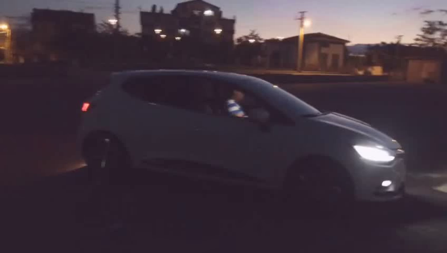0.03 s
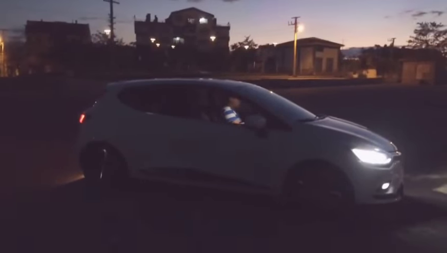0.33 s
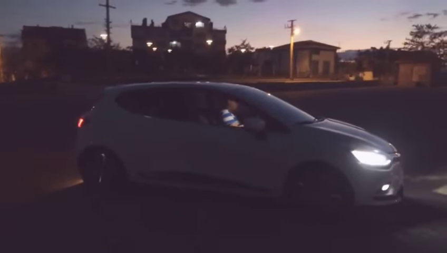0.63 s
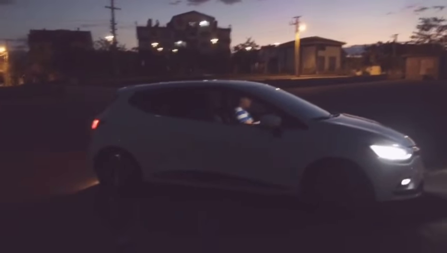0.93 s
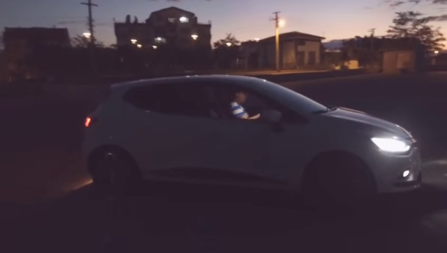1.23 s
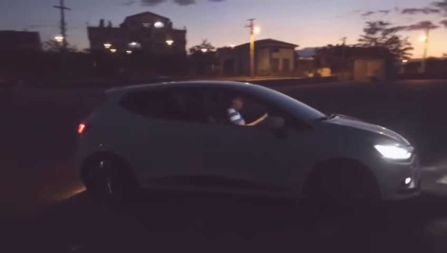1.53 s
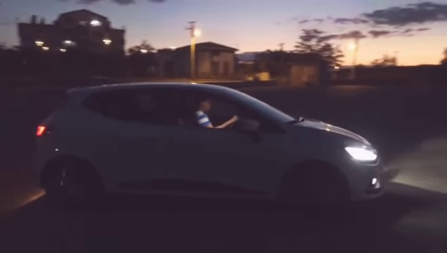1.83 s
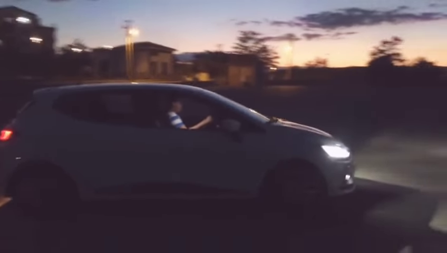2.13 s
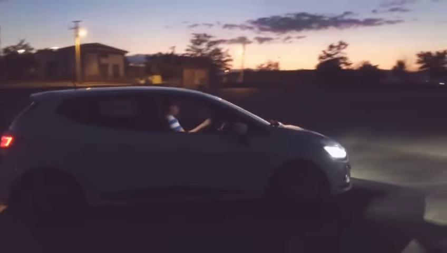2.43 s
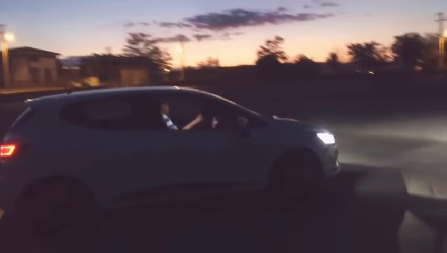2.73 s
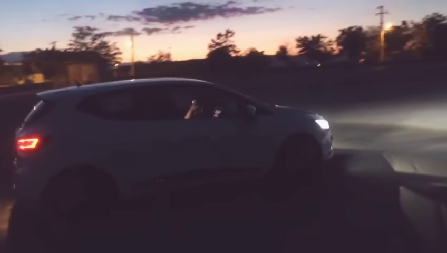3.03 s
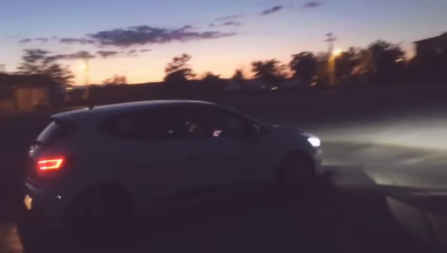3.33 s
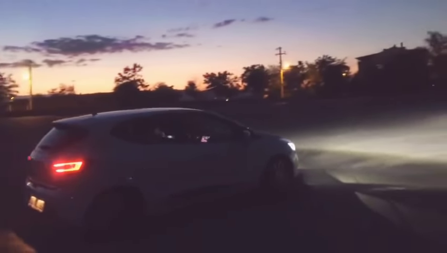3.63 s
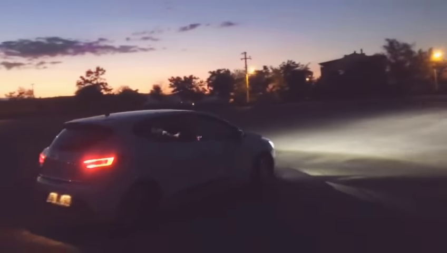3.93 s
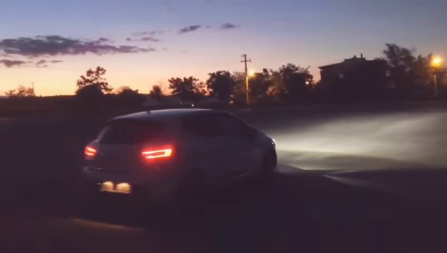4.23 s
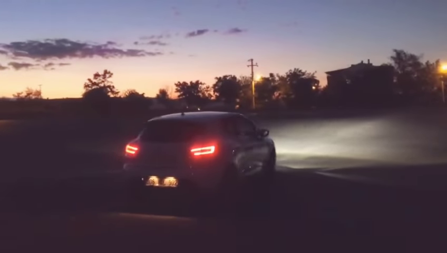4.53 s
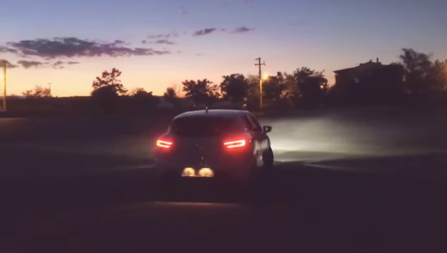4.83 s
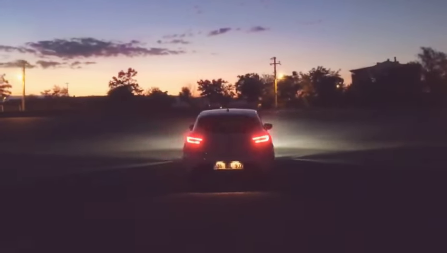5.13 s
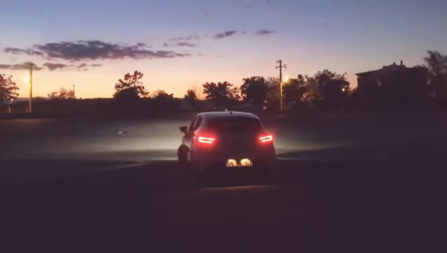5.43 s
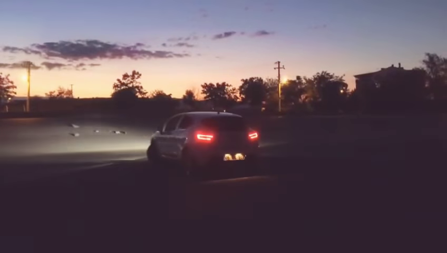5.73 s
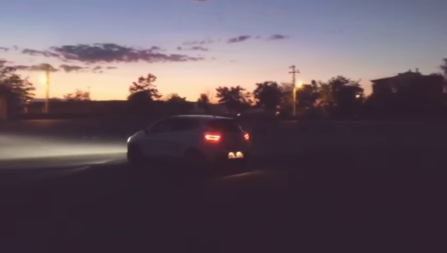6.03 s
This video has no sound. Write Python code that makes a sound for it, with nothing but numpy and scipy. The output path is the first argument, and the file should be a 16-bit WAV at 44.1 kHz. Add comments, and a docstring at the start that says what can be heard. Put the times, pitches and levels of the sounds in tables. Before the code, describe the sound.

A small diesel hatchback circles slowly on an open gravel lot, its engine knocking and humming under light wind rumble on the microphone. The tyres crunch louder as it passes close by, with ringing stone pops, hollow thuds and very short squeals. The engine sags in the turn, then picks up as the car heads away, still grinding over grit.

```python
"""An open gravel lot: a small diesel hatchback circles slowly, passes the microphone and drives off.
The engine knocks and hums underneath, sagging in the turn, with a thin belt whine on top. The tyres bite
into grit, drum, throw sand and slip in short squeals. Pinched stones pop and ring briefly in the tread,
lower from the front, higher from behind; flung grit clicks on the ground and stone chips squeak.
Light gusts buffet the microphone."""
import sys
import numpy as np
from scipy import signal
from scipy.fft import rfft, irfft
from scipy.io import wavfile
from scipy.ndimage import uniform_filter1d, map_coordinates

SR = 44100
rng = np.random.default_rng(int(sys.argv[2]) if len(sys.argv) > 2 else 0)


def to_wav(sig):
    """Store sig (one row per channel, or 1-D mono) as 16-bit WAV at the path in sys.argv[1].

    Samples outside -1..1 are clipped; the rate is SR.
    """
    pcm = np.clip(np.atleast_2d(sig), -1, 1) * 32767
    pcm = np.round(pcm).astype(np.int16)
    wavfile.write(sys.argv[1], SR, pcm.T)  # frames by channels


N = 276507

# Table levels are set ahead of each layer's trims; a spectrum gives only the tone colour.
# the car turning away: time_s, tread_ring_hz, behind_share (0 from the front, 1 from behind)
HEADING = [(0, 916.1, 0.09), (1.3, 938, 0), (1.8, 1020, 0.1), (2.2, 972.6, 0.06), (2.4, 890.8, 0.03),
           (2.62, 888, 0.13), (3.1, 1073, 0.47), (3.8, 1073, 0.5), (4.3, 1098, 0.78), (4.8, 1109, 1),
           (5.6, 1109, 0.93), (6.27, 1106, 0.78)]

# the engine idles, sags under load in the turn, then picks up: time_s, firing_hz
FIRING_RATE = [(0,46.7),(1.35,46.8),(1.6,44),(2.35,43.9),(2.85,41.3),(3.2,40.3),(3.6,42),(3.85,41.5),(4.1,43),(4.7,46.6),(5.15,51),(5.5,54),(6.27,61)]
# engine faders: time_s, exhaust_db, clatter_db
ENGINE_LEVELS = [(0,-46,-48.5),(.6,-42.5,-45.5),(1.2,-34.5,-45.5),(1.7,-41.5,-44.5),(2.4,-42.5,-50),(3.2,-42.5,-50.5),(4.2,-42,-45),(5.2,-45.5,-43.5),(6.27,-47,-43.5)]
# partials of the exhaust hum: firing_multiple, level_db
EXHAUST_PARTIALS = [(1,-4),(1.5,-11),(2,5),(3,2.5),(4,-0.5),(5,-21.5),(6,-14)]
# diesel clatter: freq_hz, level_db
CLATTER_SPECTRUM = [(100, -5.5), (220, 9.5), (350, -4.5), (600, -2), (720, 3.5), (920, 2.5), (1250, 4.5),
                    (1500, -5.5), (1900, 4.5), (2500, -22), (3300, -19.5), (4000, -18), (6000, -28),
                    (11000, -46.5)]
# the knock that strikes the engine block: freq_hz, level_db
BLOCK_BLOW_SPECTRUM = [(900,-21),(1700,-0.5),(6000,-9),(8000,-21)]
# the block's ring: pitch_hz, width_hz, level_db
BLOCK_MODES = [(1878,110,5.5),(3350,52,-18),(3900,190,-19),(5600,160,-20.5)]
# the belt's whine comes and goes as the car turns: time_s, level_db
WHINE_LEVELS = [(0,-72),(1.3,-76),(1.6,-87),(2.6,-75),(2.95,-69),(4.1,-70.5),(6.27,-75)]
# belt hiss: freq_hz, level_db
BELT_HISS_SPECTRUM = [(1500, -16.5), (3500, -3), (5700, 6.5), (7000, 6), (8600, -0.5), (11000, -7),
                      (12200, -26.5)]

# the rolling bed, louder with speed and nearness: time_s, crunch_db, grit_db
ROLL_LEVELS = [(0,-46.5,-49),(.8,-48.5,-51),(1.2,-34.5,-47),(1.5,-37,-44),(2.05,-34,-38),(2.52,-27.5,-32.5),(2.86,-34,-39),(3.1,-45,-39),(3.18,-49,-40),
               (3.4,-30,-36.5),(3.78,-35.5,-37.5),(3.89,-38,-42),(3.94,-27.5,-33.5),(4.22,-27,-39),(4.65,-30.5,-32.5),(5.13,-32,-33.5),(5.8,-28.5,-31.5),(6.27,-26,-36)]
# a tyre bites into loose stones: start_s, length_s, crunch_db, grit_db
BITES = [(1.721,0.021,-26,-39),(1.886,0.027,-28,-55),(2.117,.15,-27,-47),(2.37,.075,-24.5,-36.5),(2.59,.06,-25,-39),(2.697,.125,-29,-38.5),
         (2.894,0.023,-27,-49),(2.961,.055,-27,-38),(3.039,.09,-29.5,-39.5),(3.296,0.018,-25.5,-46),(3.488,.085,-27,-42),(3.605,0.023,-26,-48),
         (3.666,0.032,-24,-42),(3.822,0.021,-24.5,-42),(3.981,.1,-23.5,-45),(4.109,.075,-21,-40),(4.292,.05,-16.5,-44),(4.398,0.048,-23,-45),
         (4.528,0.0344,-19,-32.5),(4.654,.125,-26,-34.5),(4.839,.07,-18.5,-35),(4.939,.045,-34,-32),(5.016,.038,-22.5,-30),(5.161,.065,-23,-33.5),
         (5.272,.03,-22,-27.5),(5.373,0.043,-19.5,-34),(5.444,.075,-23.5,-33),(5.558,.022,-22.5,-37),(5.598,0.055,-25.5,-30),(5.684,.085,-29.5,-29),
         (5.86,.072,-20,-29),(5.959,.05,-20,-31),(6.017,.11,-23.5,-30.5),(6.202,0.05996,-18,-33)]
# a stone striking the tread: freq_hz, level_db
STONE_BLOW_SPECTRUM = [(100, -24.5), (400, 17.5), (2800, -5), (4200, -8.5), (7000, -26.5), (12000, -34)]
# tread resonances at the contact patch, from the front: ring_multiple, width_hz, level_db
FRONT_TREAD_MODES = [(.68,257,-22),(1,124,9.5),(2.2,171,-2),(3.1,302,-10.5)]
# the same from behind: ring_multiple, width_hz, level_db
REAR_TREAD_MODES = [(.58,196,-17.5),(1,95.4,3),(1.5,315,-10.5),(2.02,415,-14.5),(2.8,496,-34)]
# grit crackle from the front: freq_hz, level_db
FRONT_GRIT_SPECTRUM = [(400,-21.5),(800,2),(1100,6.5),(1400,-3),(1750,2.5),(2080,5),(2420,0.5),(3100,-7),(3700,-13.5),(4400,-25.5),(6300,-33),(7200,-44.5),(12000,-55.5)]
# grit crackle from behind: freq_hz, level_db
REAR_GRIT_SPECTRUM = [(400,-38),(800,-11),(1170,18),(1390,4),(1620,9.5),(2200,4),(2550,-0.5),(3200,-10),(3700,-15.5),(4400,-25),(5000,-25.5),(6300,-31.5),(7200,-46.5),(12000,-62)]
# the bright rasp of the tyres side-on: freq_hz, level_db
RASP_SPECTRUM = [(1200, -36.5), (2300, 2), (3200, 7.5), (4300, -11), (5200, -13), (7200, -27),
                 (8500, -28.5), (12000, -51)]
# sand trickling off the tyres: freq_hz, level_db
SAND_SPECTRUM = [(3000,-13),(5500,7),(7300,-7),(8700,-5.5),(10500,1),(12200,-17)]
# sand flung toward the microphone: peak_s, length_s, level_db, centre_hz
SAND_SPRAYS = [(2.61,.08,-73,8200),(2.96,.06,-73,9200),(2.96,.06,-61,4800),(2.95,.75,-74,8500),(3.48,.3,-63,5000),(3.53,.05,-76,10300),(3.93,.07,-75,9900),(6.04,.13,-50,4000)]
# the hollow thud of a tyre carcass: freq_hz, level_db
THUD_SPECTRUM = [(60, -29), (170, -3), (260, 4), (370, -1), (600, 1), (800, -2), (1300, -14), (4000, -77.5)]
# the carcasses drum as they roll: time_s, level_db
DRUM_LEVELS = [(0,-50),(1.9,-50.5),(2.4,-40.5),(3.1,-45.5),(4.2,-33.5),(4.7,-37.5),(5.75,-43.5),(6.27,-41)]
# a tyre drops over a bump: peak_s, length_s, level_db
BUMPS = [(1.554,0.059,-39.5),(1.716,0.049,-38),(2.059,0.056,-34.5),(2.491,0.039,-29.5),(2.952,0.12,-38),(3.84,0.025,-32),(4.177,0.044,-27),(4.425,0.058,-25.5),(4.877,0.091,-34.5),(5.315,0.09,-38)]

# the breeze between gusts: time_s, level_db
BREEZE_LEVELS = [(0,-43),(.55,-40.5),(.8,-42),(1.5,-36),(2.9,-35.5),(3.2,-42),(3.55,-37),(3.93,-39.5),(4.4,-40.5),(5.4,-37),(6.27,-46.5)]
# gusts on the microphone: peak_s, length_s, rumble_db, flutter_db
GUSTS = [(0.167,0.038,-24,-54),(0.267,0.036,-35,-57),(0.719,0.068,-31,-48),(0.911,0.35,-27.5,-33),(1.171,0.08,-30,-42),(1.31,0.16,-27,-56),(1.419,.072,-31.5,-50),
         (1.556,0.042,-35,-35.5),(1.743,.014,-23,-47),(1.889,0.089,-30.5,-59),(2.064,0.018,-24.5,-24),(2.217,0.072,-30.5,-44),(2.456,0.051,-36,-46),
         (2.631,.09,-32.5,-60),(2.822,0.012,-27.5,-54),(4.13,0.084,-32.5,-38),(5.271,0.01,-25,-45),(5.338,0.091,-31.5,-28.5),(5.513,0.067,-32,-42)]
# low wind rumble: freq_hz, level_db
BUFFET_SPECTRUM = [(15, -52), (30, -14), (45, -4), (75, 3), (110, -2), (180, -11), (280, -21.5),
                   (450, -27.5), (1500, -83)]
# small eddies at the microphone port: freq_hz, level_db
FLUTTER_SPECTRUM = [(70,-28.5),(140,3.5),(190,5.5),(290,-4.5),(420,-19.5),(1200,-79.5)]

# flung grit lands: start_s, peak_db, cutoff_hz
GRIT_TICKS = [(.305,-33,2500),(4.068,-29,4500),(5.039,-34,9000),(5.082,-19,2000)]
# its dry click: freq_hz, level_db
TICK_SPECTRUM = [(200, -5), (900, -1), (3200, -6), (4300, -11), (6500, -17), (9000, -27), (12000, -31)]
# the tread slips and squeals: start_s, length_s, level_db, from_hz, to_hz
SQUEALS = [(1.215,0.022,-37.5,928,1057),(2.169,.075,-29.5,1008,962),(2.744,0.0395,-29.5,970,1082),(4.84,0.0453,-20.5,1044,1144),
           (5.734,0.026,-23,1079,1065),(5.901,0.012,-16.5,1090,1065),(6.208,0.038,-26,1094,1055)]
# the largest stones pinched under the tread: pinch_s, level_db, ring_hz
BIG_STONES = [(1.641,-22.5,950),(1.782,-20,1015),(2.18,-15.5,940),(2.203,-18,860),(2.216,-11,950),(2.24,-15.5,890),(2.268,-18.5,840),(2.302,-14.5,930),
              (2.373,-10,933),(2.398,-10,862),(2.417,-9.5,860),(2.48,-9.5,830),(2.588,-16.5,870),(2.616,-12.5,860),(2.718,-18.5,990),(3.362,-17.5,1030),(3.427,-19,990),
              (3.51,-19,945),(3.984,-17,1060),(4.167,-16.5,1080),(4.291,-15,1095),(4.304,-8,1070),(4.357,-10,1080),(4.426,-15,1114),(4.538,-18.5,1240),(4.551,-20,1080),
              (4.839,-14.5,1020),(4.88,-13.5,1070),(5.019,-16,970),(5.044,-17.5,1050),(5.081,-13.5,1120),(5.276,-13,1170),(5.404,-17,1090),(5.451,-13.5,1096),
              (5.875,-15,1114),(5.907,-5.5,1070),(5.96,-18,1050),(5.978,-15.5,1096),(6.005,-14,1074),(6.234,-13.5,1090)]
# stone chips squeak: start_s, pitch_hz, level_db, t60_s
CHIP_SQUEAKS = [(5.164, 6650, -46, 0.04), (6.078, 3086, -25, 0.04)]


def amp(db):
    """Decibels to gain."""
    return 10 ** (np.asarray(db) / 20)


def unit(x):
    """x at rms 1."""
    return x / np.sqrt(np.mean(x ** 2) + 1e-20)


def curves(rows):
    """Automation lanes: one value per sample for each column after the time."""
    times, *columns = np.transpose(rows)
    return [np.interp(np.arange(N) / SR, times, column) for column in columns]


def wobble(rate):
    """A smooth random curve, rate knots a second."""
    knots = rng.standard_normal(int(N * rate / SR) + 4)
    return map_coordinates(knots, [np.arange(N) * rate / SR])


def response(spectrum, modes=(), size=8192):
    """Minimum-phase impulse response of peak 1 with a given spectrum and resonances."""
    hz = np.fft.rfftfreq(size, 1 / SR)
    points_hz, points_db = np.transpose(spectrum)
    gain = amp(np.interp(np.log(hz + 1), np.log(points_hz), points_db))
    if len(modes):
        peaks = [amp(db) * hz * width / (centre ** 2 - hz ** 2 + 1j * hz * width)
                 for centre, width, db in modes]
        gain = gain * np.sqrt(sum(abs(peak) ** 2 for peak in peaks))
    cepstrum = irfft(np.log(np.maximum(gain, 1e-5)))
    cepstrum[1:size // 2] *= 2
    cepstrum[size // 2 + 1:] = 0
    impulse = irfft(np.exp(rfft(cepstrum)))
    return impulse / abs(impulse).max()


def through(x, impulse):
    """x sounding through an impulse response."""
    return signal.fftconvolve(x, impulse)[:N]


def coloured(x, spectrum, modes=()):
    """x shaped by a spectrum and resonances, at rms 1."""
    return unit(through(x, response(spectrum, modes)))


def grains(rate, spread_db, clump_db, window=2646):
    """Random contacts of uneven size that come in clumps, with a steady mean power."""
    hits = (rng.random(N) < rate / SR) * rng.choice([-1, 1], N)
    sizes_db = spread_db * np.minimum(rng.exponential(size=N), 4) + clump_db * wobble(90)
    contacts = hits * amp(sizes_db)
    power = uniform_filter1d(uniform_filter1d(contacts ** 2, window), window)
    return contacts / np.sqrt(abs(power) + 1e-9)


def swells(base_db, events, rise_share=0.58):
    """Gain of a bed with (peak_s, length_s, level_db) swells on top, rising slower than they fall."""
    t, power = np.arange(N) / SR, amp(base_db) ** 2 + np.zeros(N)
    for s, length, db in events:
        near = slice(max(int((s - 2 * length) * SR), 0), int((s + 2 * length) * SR))
        age = t[near] - s
        width = length * np.where(age < 0, rise_share, 1 - rise_share)
        power[near] += amp(db) ** 2 * np.exp(-2 * (age / width) ** 2)
    return np.sqrt(power)


def bite(start_s, length_s, attack_s=.002, release_s=.005):
    """Envelope of a tyre's bite: it catches abruptly, holds, and lets go."""
    age = np.arange(N) / SR - start_s
    return np.clip(age / attack_s, 0, 1) * np.exp(-np.clip((age - length_s) / release_s, 0, 20))


def perspective():
    """How much the car is heard from behind, and how much side-on, both 0-1."""
    behind = np.clip(curves(HEADING)[1], 0, 1)
    return behind, 4 * behind * (1 - behind)


def ground_bounce(x, delay_s=0.00139, side_delay_s=0.00028, gain=0.06, side_gain=0.09):
    """The bounce off the ground combs the sound, later and stronger as the car passes side-on."""
    _, side_on = perspective()
    bounce = map_coordinates(x, [np.arange(N) - (delay_s + side_delay_s * side_on) * SR], order=1)
    return unit(x + (gain + side_gain * side_on) * bounce)


def engine(knock_db=-5, block_db=-3, decay_per_firing=1.4, uneven_db=4.0, scatter_db=1.0):
    """A low, uneven exhaust hum, and at every firing a diesel knock that rattles and rings the block."""
    firing_hz, = curves(FIRING_RATE)
    exhaust_db, clatter_db = curves(ENGINE_LEVELS)
    behind, _ = perspective()
    firings = np.cumsum(firing_hz * (1 + .007 * wobble(8))) / SR
    hum = sum(amp(db + uneven_db * wobble(16)) * np.sin(2 * np.pi * (k * firings + rng.random()))
              for k, db in EXHAUST_PARTIALS)
    knocks = unit(np.diff(np.floor(firings), prepend=0))
    rattle = unit((.5 + np.exp(-decay_per_firing * (firings % 1))) * rng.standard_normal(N))
    t = np.arange(SR // 40) / SR
    casing = rng.standard_normal(len(t)) * np.exp(-decay_per_firing * firing_hz.mean() * t)
    blows = (amp(knock_db) * unit(through(knocks, casing)) + rattle) * amp(scatter_db * wobble(50))
    block = amp(block_db) * (1 - behind) * coloured(blows, BLOCK_BLOW_SPECTRUM, BLOCK_MODES)
    clatter = ground_bounce(coloured(blows, CLATTER_SPECTRUM))
    return amp(exhaust_db) * unit(hum) + amp(clatter_db) * (clatter + block)


def belt_whine(pitch_hz=4850, width_hz=210, flutter_db=5.0, hiss_db=-71, hidden_db=-12):
    """The belt drive: a fuzzy, fluttering tone, and a hiss that the car hides as it turns away."""
    level_db, = curves(WHINE_LEVELS)
    behind, _ = perspective()
    gain = amp(level_db + flutter_db * wobble(23))
    phase = 2 * np.pi * np.cumsum(pitch_hz * (1 + 0.0023 * wobble(2.0))) / SR
    tone = unit(wobble(width_hz) * np.cos(phase) + wobble(width_hz) * np.sin(phase))
    hiss = coloured(rng.standard_normal(N), BELT_HISS_SPECTRUM)
    return gain * tone + amp(hiss_db + hidden_db * behind) * hiss


def tread(modes, ring_hz):
    """Impulse response of the tread, struck by a stone and ringing at a given pitch."""
    return response(STONE_BLOW_SPECTRUM, [(k * ring_hz, width, db) for k, width, db in modes], size=4096)


def grinding(modes, detune, waver=.02, waver_hz=22, stretch=0.0688):
    """Dense stone contacts ring the tread; its pitch wavers and climbs as each bite stretches it."""
    t = np.arange(N) / SR
    bend = detune + waver * wobble(waver_hz)
    for s, length, _, _ in BITES:
        middle = s + length / 2
        near = abs(t - middle) < 2 * length
        age = 2 * (t[near] - middle) / length
        bend[near] += stretch * age * np.exp(-age ** 2 / 2)
    ring_hz = curves(HEADING)[0] * (1 + bend)
    steady = through(grains(800, spread_db=3.0, clump_db=3.0), tread(modes, ring_hz.mean()))
    varispeed = np.cumsum(ring_hz / ring_hz.mean())
    return unit(map_coordinates(steady, [varispeed], mode="reflect"))


def carcass():
    """Dense soft blows on a hollow tyre, at rms 1."""
    return coloured(grains(900, spread_db=2.5, clump_db=3.0), THUD_SPECTRUM)


def crackle(spectrum):
    """Fine grit crackling under a tyre, at rms 1."""
    return coloured(grains(4000, spread_db=0.0, clump_db=2.5), spectrum)


def gravel(crunch_trim_db=-7.0, grit_trim_db=-1, rasp_db=-8, drum_db=-15, tyre_split=.09):
    """Stones grind and drum under the tyres while grit crackles; the colour shifts as the car turns."""
    crunch_power, grit_power = amp(curves(ROLL_LEVELS)) ** 2
    for s, length, crunch_db, grit_db in BITES:
        power = bite(s, length) ** 2
        crunch_power += amp(crunch_db) ** 2 * power
        grit_power += amp(grit_db) ** 2 * power
    behind, side_on = perspective()
    front_gain, rear_gain = np.sqrt(1 - behind), np.sqrt(behind)
    # side-on, the front tyres ring lower and the rear ones higher
    front = grinding(FRONT_TREAD_MODES, -tyre_split * side_on)
    rear = grinding(REAR_TREAD_MODES, tyre_split * side_on * (1 - behind))
    crunch = front_gain * front + rear_gain * rear + amp(drum_db) * carcass()
    grit = front_gain * crackle(FRONT_GRIT_SPECTRUM) + rear_gain * crackle(REAR_GRIT_SPECTRUM)
    # side-on, nothing hides the contact patches, so their bright rasp comes through
    rasp = amp(rasp_db) * side_on * crackle(RASP_SPECTRUM)
    return (amp(crunch_trim_db) * np.sqrt(crunch_power) * crunch
            + amp(grit_trim_db) * np.sqrt(grit_power) * ground_bounce(grit + rasp))


def sand(trickle_db=-87, side_db=6, width_share=0.15, sizzle_db=3):
    """Fine sand hisses off the tyres, clearest side-on, and grainy sprays fly toward the microphone."""
    _, side_on = perspective()
    trickle = coloured(grains(2500, spread_db=8.0, clump_db=6.0), SAND_SPECTRUM)
    out = amp(trickle_db + side_db * side_on) * trickle
    specks = grains(1500, spread_db=1.5, clump_db=sizzle_db)
    for s, length, db, hz in SAND_SPRAYS:
        edges_hz = hz * np.exp(width_share * np.array([-.5, .5]))
        band = signal.butter(2, edges_hz, "band", fs=SR, output="sos")
        out += swells(-np.inf, [(s, length, db)]) * unit(signal.sosfilt(band, specks))
    return out


def tyre_thuds():
    """The tyre carcasses drum as they roll, and thud at every bump."""
    return swells(curves(DRUM_LEVELS)[0], BUMPS) * carcass()


def eddies(spectrum):
    """Lumpy turbulence at the microphone port, at rms 1."""
    return coloured(grains(700, spread_db=1.5, clump_db=4.0), spectrum)


def wind(trim_db=-1, breeze_flutter_db=-16, push_db=3, push_lead_s=0.01277):
    """Breeze and gusts rumble and flutter on the microphone; each gust thumps just before its peak."""
    breeze_db, = curves(BREEZE_LEVELS)
    rumble_swells = [(s, length, db) for s, length, db, _ in GUSTS]
    flutter_swells = [(s, length, db) for s, length, _, db in GUSTS]
    rumble = swells(breeze_db, rumble_swells) * eddies(BUFFET_SPECTRUM)
    flutter = swells(breeze_db + breeze_flutter_db, flutter_swells) * eddies(FLUTTER_SPECTRUM)
    pushes = np.zeros(N)
    for s, _, db, _ in GUSTS:
        pushes[round((s - push_lead_s) * SR)] = amp(db + push_db)
    return amp(trim_db) * (rumble + flutter + through(pushes, response(BUFFET_SPECTRUM)))


def grit_ticks(decay_s=0.0067):
    """Bits of flung grit land with a dry click, duller on soft ground."""
    out, t = np.zeros(N + SR), np.arange(SR // 50) / SR
    for s, db, cutoff_hz in GRIT_TICKS:
        dulled = [(hz, level - 10 * np.log10(1 + (hz / cutoff_hz) ** 4)) for hz, level in TICK_SPECTRUM]
        click = through(rng.standard_normal(len(t)) * np.exp(-t / decay_s), response(dulled))
        out[round(s * SR):][:len(click)] += amp(db) * click / abs(click).max()
    return out[:N]


def tyre_squeals(waver=0.0499, waver_hz=300, judder_db=3.0, judder_hz=170, octave_db=-8, hidden_db=-11):
    """The tread sticks and slips in short, juddering squeals; their octave is fainter from behind."""
    out, t = np.zeros(N), np.arange(N) / SR
    behind, _ = perspective()
    slip = 1 + waver * wobble(waver_hz)
    judder = amp(judder_db * np.tanh(wobble(judder_hz)))
    octave_gain = amp(octave_db + hidden_db * behind)
    for s, length, db, from_hz, to_hz in SQUEALS:
        glide_hz = np.interp(t, [s, s + length], [from_hz, to_hz])
        phase = 2 * np.pi * np.cumsum(glide_hz * slip) / SR
        tone = np.sin(phase) + octave_gain * np.sin(2 * phase)
        out += amp(db) * bite(s, length) * unit(judder * tone)
    return out


def pebbles(over_db=6, spread_db=-0.5, detune=0.024, count=50):
    """Smaller stones caught at random, riding the rolling level: rows of pinch_s, level_db, ring_hz."""
    rolling_db, ring_hz = curves(ROLL_LEVELS)[0], curves(HEADING)[0]
    moments, draws = rng.integers(0, N, count), rng.standard_normal((count, 2))
    return [(at / SR, rolling_db[at] + over_db + spread_db * size, ring_hz[at] * (1 + detune * tune))
            for at, (size, tune) in zip(moments, draws)]


def stone_pops(pop_db=-1, knock_db=-11, skid_db=-9, skid_s=0.0045, swell_s=0.0015, lag_s=0.000972):
    """A pinched stone snaps free with a knock: the tread rings for a few cycles while the stone skids."""
    pops, knocks = np.zeros(N + SR), np.zeros(N)
    t = np.arange(SR // 20) / SR
    behind, _ = perspective()
    for s, db, ring_hz in BIG_STONES + pebbles():
        at = min(round((s + lag_s) * SR), N - 1)
        modes = REAR_TREAD_MODES if behind[at] > .5 else FRONT_TREAD_MODES
        ring = sum(amp(level) * np.sin(2 * np.pi * (k * ring_hz * t + rng.random()))
                   for k, _, level in modes)
        ring = ring * (t / swell_s) * np.exp(-t / swell_s)
        scrape = rng.standard_normal(len(t)) * np.exp(-t / skid_s)
        skid = through(scrape, tread(modes, ring_hz))[:len(t)]
        pop = ring / abs(ring).max() + amp(skid_db) * skid / abs(skid).max()
        pops[at:at + len(t)] += amp(db + pop_db) * pop
        knocks[at] = amp(db + knock_db)
    return pops[:N] + through(knocks, response(THUD_SPECTRUM))


def chip_squeaks(waver=.05, waver_hz=900, attack_s=0.00031):
    """Thin, unsteady squeaks of stone on stone."""
    out = np.zeros(N)
    for s, hz, db, t60 in CHIP_SQUEAKS:
        age = np.maximum(np.arange(N) / SR - s, 0)
        phase = 2 * np.pi * np.cumsum(hz * (1 + waver * wobble(waver_hz))) / SR
        out += amp(db - 60 * age / t60) * (1 - np.exp(-age / attack_s)) * np.sin(phase)
    return out


def scene():
    """Car and wind in mono, out in the open with no walls near."""
    motor = engine() + belt_whine()
    tyres = gravel() + tyre_squeals() + sand() + tyre_thuds()
    loose_stones = stone_pops() + grit_ticks() + chip_squeaks()
    return (motor + tyres + loose_stones + wind())[None]


def record(dry, start_s=.083, fade_s=.004, top_hz=12200):
    """The microphone opens after a moment, with a quick fade at each end and a steep high cut."""
    t = np.arange(N) / SR
    fades = np.clip(np.minimum(t - start_s, t[-1] - t) / fade_s, 0, 1)
    high_cut = signal.ellip(10, .1, 90, top_hz, fs=SR, output="sos")
    return signal.sosfilt(high_cut, dry * fades)


dry = scene()
out = record(dry)
to_wav(out)
```